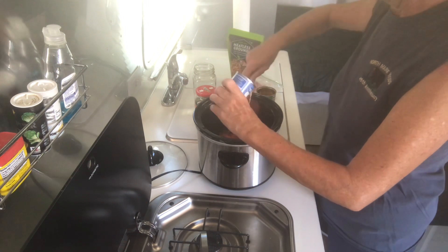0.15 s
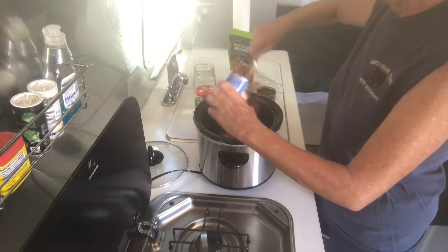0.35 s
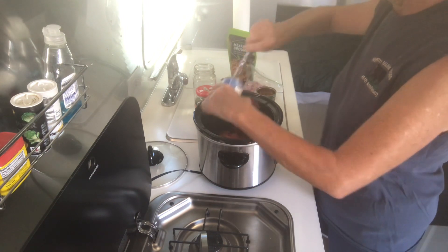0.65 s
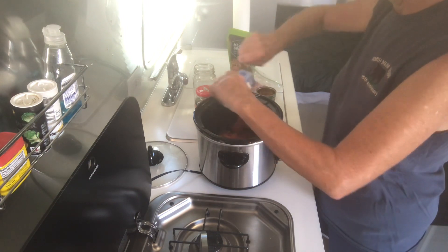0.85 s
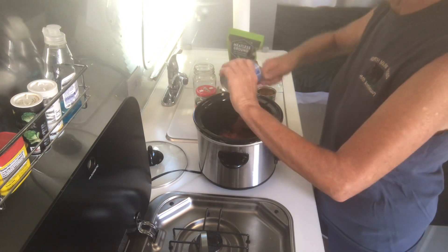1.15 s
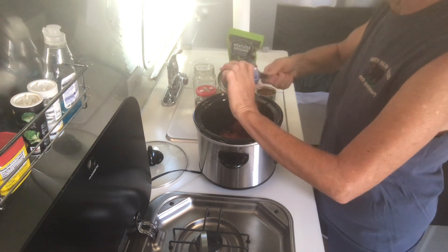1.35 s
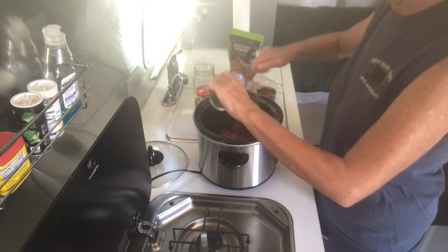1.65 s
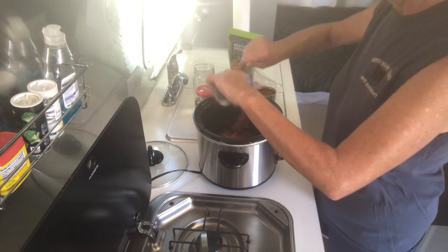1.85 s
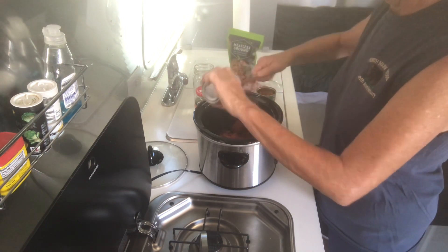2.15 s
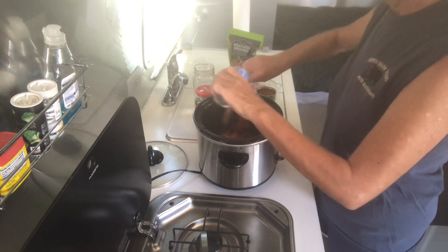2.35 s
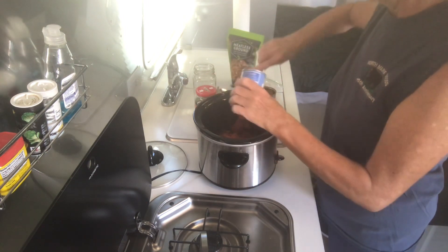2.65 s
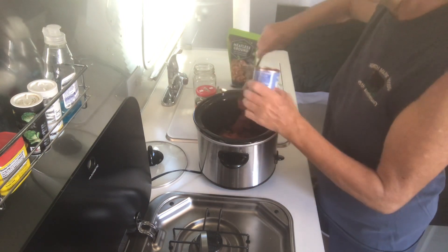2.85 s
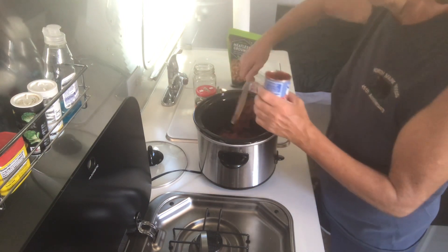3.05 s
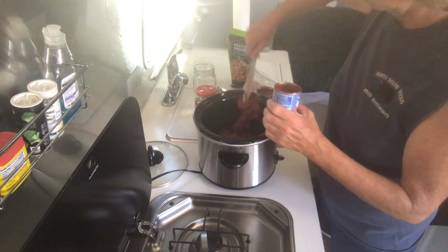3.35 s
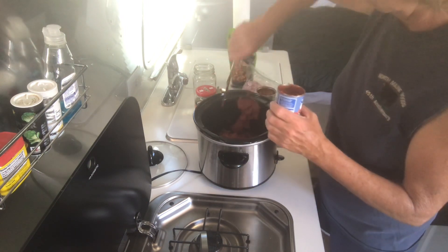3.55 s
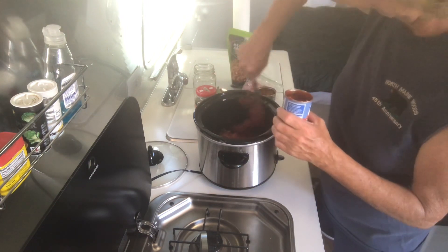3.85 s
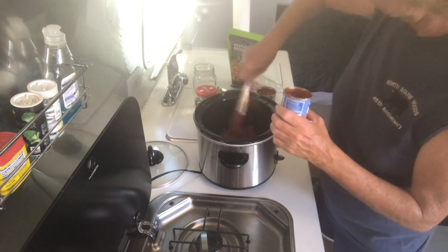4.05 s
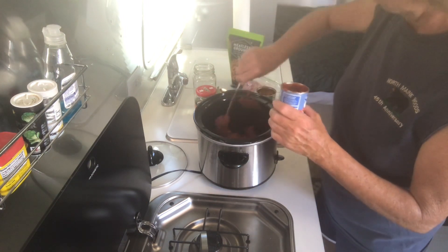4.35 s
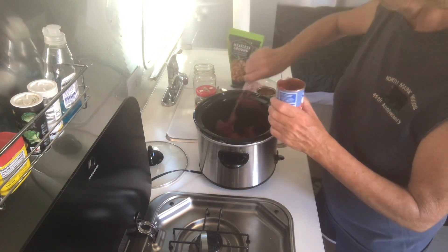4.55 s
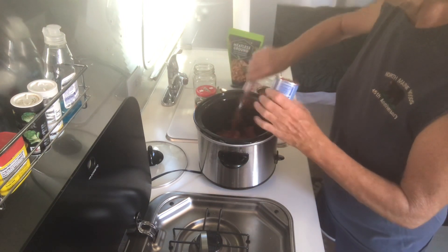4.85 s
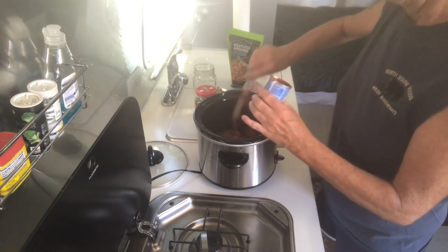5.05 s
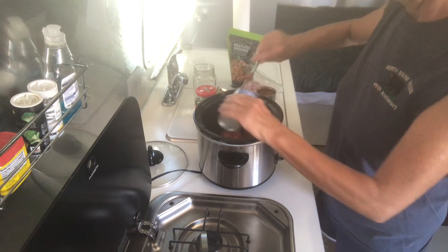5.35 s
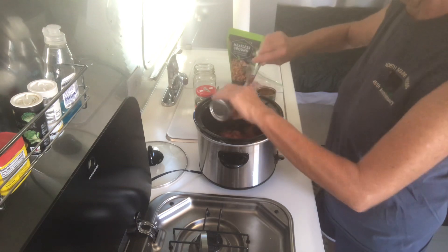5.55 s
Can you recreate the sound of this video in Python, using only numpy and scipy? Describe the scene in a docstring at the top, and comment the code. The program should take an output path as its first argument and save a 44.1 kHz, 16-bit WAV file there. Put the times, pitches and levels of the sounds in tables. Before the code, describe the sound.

A faint low appliance hum with soft rumble and hiss runs throughout in a small kitchen with a very short reflection, heard in mono from fairly near. At 0.15 s a steel spoon hits the stoneware rim of a slow cooker: a hard, bright clack with a short damped ring and a brief drag. From about 0.67 to 2.1 s the spoon works in a small tin: a quick pair of clanks near 0.7 with a scrape and slight squeak, duller bumps near 0.86 and 1.37, a sharper clank at 1.78, bumps near 2.1, and faint hollow rasps between. At 2.4 s another rim knock leads to a quiet 0.3-second drag; at 3.1 s a softer knock and faint wipe. At 3.6 s comes the strongest, brightest knock, followed by a gritty wipe with thin wavering squeaks until about 3.95. Afterward, only tiny ticks and wet paste touches, near 4.05, 4.4, 5.1 and 5.35 s.

```python
"""An appliance hums under a faint hiss; then a steel spoon knocks on the stoneware rim of a slow cooker.
After each knock the spoon drags over the rim, which sings and squeaks. In between it digs paste from a tin can.
Knocks and bumps are fading sine tones and noise; drags and scrapes are tiny random slips sent through resonances;
squeaks are gliding, wavering tones. A small kitchen answers all but the hum and hiss."""
import sys
import numpy as np
from scipy import signal
from scipy.fft import rfft, irfft, next_fast_len
from scipy.io import wavfile
from scipy.ndimage import uniform_filter1d, map_coordinates

SR = 44100
rng = np.random.default_rng(int(sys.argv[2]) if len(sys.argv) > 2 else 0)


def store_wav(level_fs):
    """Save 16-bit WAV to argv[1]."""
    pcm = np.round(np.clip(np.atleast_2d(level_fs), -1, 1) * 32767)
    wavfile.write(sys.argv[1], SR, pcm.T.astype(np.int16))


N = 251811  # length in samples


def amp(db):
    """Turn decibels into a gain."""
    return 10 ** (np.asarray(db) / 20)


def unit(x):
    """Scale to an rms of 1."""
    return x / np.sqrt(np.mean(x ** 2) + 1e-20)


def along(points, hz):
    """Read a curve of (Hz, value) points, with straight lines on a log-frequency axis."""
    point_hz, value = np.transpose(points)
    return np.interp(np.log(hz + 1), np.log(point_hz + 1), value)


def filtered(x, response):
    """Multiply the spectrum of x by a function of frequency."""
    size = next_fast_len(len(x) + 8192)  # room for the ringing, so it does not wrap around
    spectrum = rfft(x, size) * response(np.fft.rfftfreq(size, 1 / SR))
    return irfft(spectrum, size)[:len(x)]


def noise(colour_db, size):
    """Noise of rms 1 whose spectrum follows a function of frequency in dB."""
    return unit(filtered(rng.standard_normal(size), lambda hz: amp(colour_db(hz))))


def hump(hz, centre_hz, octaves):
    """A bell of height 1 on a log-frequency axis."""
    return np.exp(-.5 * (np.log2((hz + 1) / centre_hz) / octaves) ** 2)


def below(hz, edge_hz, order=4):
    """A share that falls from 1 to 0 around the edge."""
    return 1 / (1 + (hz / edge_hz) ** order)


def resonances(modes, hz):
    """Causal response of (Hz, width Hz, dB) resonances, added with alternating sign."""
    total = 0
    for k, (centre, width, db) in enumerate(modes):
        peak = 1j * hz * width / (centre * centre - hz * hz + 1j * hz * width)
        total = total + (-1) ** k * amp(db) * peak
    return total


def wobble(rate, size=N):
    """A smooth random curve with `rate` random points a second."""
    points = rng.standard_normal(int(size * rate / SR) + 4)
    return map_coordinates(points, [np.arange(size) * rate / SR])


def add(track, s, sound):
    """Mix a sound into the track at time s, cutting it off at the track's end."""
    part = track[round(s * SR):][:len(sound)]
    part += sound[:len(part)]


def slips(rate, spread_db, flutter_db, roam_db):
    """Friction force: tiny uneven slips; as the contact point travels, they favour ever different frequencies."""
    happens = rng.random(N) < rate / SR  # about `rate` slips a second
    force = happens * rng.choice([-1, 1], N) * amp(spread_db * rng.standard_normal(N))
    z = signal.stft(force * amp(flutter_db * wobble(90)), nperseg=512)[2]
    # random patches over frequency and time, smoothed both ways
    field = uniform_filter1d(rng.standard_normal(z.shape), size=4, axis=0)
    field = uniform_filter1d(field, size=10, axis=1)
    return unit(signal.istft(z * amp(roam_db * unit(field)), nperseg=512)[1][:N])


def stroke(s, length, attack_s, release_s):
    """One move of the hand: its attack-hold-release gain and its progress from 0 to 1."""
    t = np.arange(N) / SR - s
    gain = np.clip(t / attack_s, 0, 1) * np.exp(-np.maximum(t - length, 0) / release_s)
    return gain, np.clip(t / length, 0, 1)


# How long the kitchen's answer lasts. Each row: frequency in Hz, time to fall by 60 dB in seconds.
KITCHEN_DECAY = [(150, 0.3), (1000, 0.21), (4000, 0.17), (14000, 0.15)]


def in_kitchen(x, wet_db, delay=0.0043):
    """Direct sound and, `delay` seconds later, the short fading answer of counter, walls and cupboards."""
    hz, t, z = signal.stft(rng.standard_normal(SR // 3), SR, nperseg=256)
    fade = amp(-60 * t / along(KITCHEN_DECAY, hz)[:, None])
    tail = signal.istft(z * fade, SR, nperseg=256)[1]
    tail = np.pad(tail / np.linalg.norm(tail), (round(delay * SR), 0))
    answer = amp(wet_db) * signal.fftconvolve(x, tail)[:len(x)]
    return (x + answer) / np.hypot(1, amp(wet_db))


# Colour of the rumble and hiss. Each row: frequency in Hz, relative level in dB.
AIR_COLOUR = [(20, -48.5), (30, -25), (45, -4.5), (65, -6), (100, -1), (150, -10), (230, -15), (420, -20.5),
              (1200, -22.5), (1750, -27.5), (4500, -33.5), (10400, -41), (13000, -39.5), (16000, -46.5)]
# Tones of the appliance. Each row: frequency in Hz, middle level in dB.
HUM_TONES = [(58, -63.5), (115.5, -64), (169, -70.5), (227, -79), (281, -82.5), (332, -81.5), (1179, -83)]


def background(air_db=-60, drift=0.49, waver_db=3.0):
    """An appliance motor hums in unsteady sine tones over the room's rumble and hiss of coloured noise."""
    t = np.arange(N) / SR
    hum = np.zeros(N)
    for hz, db in HUM_TONES:
        level = np.sqrt(2) * amp(db + waver_db * wobble(4.1))
        hum += level * np.sin(2 * np.pi * hz * t + drift * wobble(28))
    return hum + amp(air_db) * noise(lambda hz: along(AIR_COLOUR, hz), N)


# Light touches and wet paste smacks. Each row: start in seconds, level in dB, centre of the noise in Hz.
TOUCHES = [(.314, -45, 5200), (.882, -43.5, 6000), (1.525, -59, 7800), (2.574, -55, 6500),
           (3.334, -64, 9000), (4.0503, -55.5, 9400), (4.433, -61, 12000), (4.448, -56, 2790),
           (5.075, -63.5, 3200), (5.115, -64.5, 11000), (5.355, -64, 3310)]


def ticks(t60=0.037, focus_db=26, octaves=1.0):
    """Small touches of spoon and paste: short noise that dies away without ring."""
    out, t = np.zeros(N), np.arange(SR // 5) / SR
    for s, db, centre_hz in TOUCHES:
        touch = noise(lambda hz: focus_db * hump(hz, centre_hz, octaves), len(t))
        add(out, s, touch * amp(db - 60 * t / t60))
    return in_kitchen(out, wet_db=-7)


# Resonances of the can and the air in it. Each row: frequency in Hz, width in Hz, relative level in dB.
CAN_MODES = [(350, 44, -11), (606, 58, -9.5), (820, 103, -5.5), (923, 26.6, 6), (1230, 55, 2.5),
             (1680, 44, -11), (1853, 66, -12.5), (2597, 130, -5.5), (3240, 290, -14), (3460, 130, -11.5),
             (3710, 440, -14.5), (4730, 160, -10.5), (6140, 290, -14.5), (6190, 83, -8), (7520, 39, -18),
             (8700, 65, -23)]
# Colour of steel on tin. Each row: frequency in Hz, relative level in dB.
TIN_COLOUR = [(150, -6), (400, -11.5), (1000, 1), (1900, -3), (3300, 3), (5000, 1.5), (6500, 1.5),
              (9000, -2), (11000, -7), (14000, -6.5), (16000, -13)]
# The spoon bumps the can. Each row: start in seconds, clack level in dB, favoured frequency in Hz,
# its boost in dB, time for the clack to fall by 60 dB in seconds, boost of the lower part in dB.
CAN_BUMPS = [(0.6651, -25.5, 3070, 14, 0.037, 4.5), (0.7112, -29, 3020, 14, 0.024, 13.5),
             (0.858, -41, 1360, 18.5, 0.067, 9.5), (1.3658, -36, 347, 21.5, 0.049, 15),
             (1.7758, -28.5, 3780, -1, 0.072, -1), (1.956, -52, 1050, 10, 0.07, 2),
             (2.09, -34, 1055, 6.5, 0.11, 8.5), (2.117, -35, 2640, 16.5, 0.044, 8)]


def can_bumps(ring_db=-6, favour_octaves=0.19):
    """Hand and paste damp the tin: a short noise clack, and a hollow ring it excites in the can."""
    out, t = np.zeros(N), np.arange(SR // 3) / SR
    for s, db, spot_hz, spot_db, t60, thud_db in CAN_BUMPS:
        def colour(hz):
            spot = spot_db * hump(hz, spot_hz, favour_octaves)
            return along(TIN_COLOUR, hz) + spot + thud_db * below(hz, 2900)
        clack = noise(colour, len(t)) * amp(-60 * t / t60)
        ring = unit(filtered(clack, lambda hz: resonances(CAN_MODES, hz))) * np.std(clack)
        add(out, s, amp(db) * in_kitchen(clack + amp(ring_db) * ring, wet_db=-9))
    return out


SCRAPE_ATTACK_S, SCRAPE_RELEASE_S = 0.012, .014  # the edge bites; the paste stops it
# Strokes of the spoon along the can wall. Each row: start in seconds, length in seconds, starting level in dB,
# gain in pressure over the stroke in dB, level of the rasp over the hollow ring in dB.
WALL_STROKES = [(0.705, 0.15, -41, -8.5, -4), (0.874, 0.19, -50, -7, 2), (1.086, 0.061, -52, 1.5, -0.5),
                (1.192, 0.19, -56.5, 4.5, -2), (1.386, 0.065, -57.5, 7.5, -1),
                (1.782, 0.033, -51.5, -4, 11.5), (1.826, .11, -48.5, -4, -1), (1.95, 0.17, -53.5, 9.5, 1.5)]


def can_scrapes(grit_db=-19):
    """The spoon's edge chatters along the wall: slips ring the air in the can and the thin tin."""
    hollow, rasp = np.zeros((2, N))
    for s, length, db, press_db, edge_db in WALL_STROKES:
        gain, progress = stroke(s, length, SCRAPE_ATTACK_S, SCRAPE_RELEASE_S)
        pressure = gain * amp(db + press_db * progress)
        hollow += pressure
        rasp += pressure * amp(edge_db)

    def body(hz):
        return resonances(CAN_MODES, hz) + amp(grit_db + along(TIN_COLOUR, hz))

    # the air rings alike wherever the spoon is; the wall answers differently from spot to spot
    air_slips = slips(rate=1700, spread_db=0.5, flutter_db=0.5, roam_db=-0.6)
    wall_slips = slips(rate=2500, spread_db=1.5, flutter_db=2.1, roam_db=3.0)
    cavity = unit(filtered(air_slips, lambda hz: body(hz) * below(hz, 2440)))
    wall = unit(filtered(wall_slips, lambda hz: body(hz) * (1 - below(hz, 1690))))
    return in_kitchen(hollow * cavity + rasp * wall, wet_db=-8.5)


# The steel sticks and squeaks on tin or glaze. Each row: start in seconds, length in seconds,
# starting pitch in Hz, ending pitch in Hz, middle level in dB (both pitch and level waver around these).
SQUEAK_TONES = [(0.713, 0.084, 1248, 1215, -47.5), (3.649, 0.032, 2557, 2494, -37.5),
                (3.681, 0.08, 2460, 2390, -49), (3.682, 0.032, 6140, 7100, -47),
                (3.792, 0.078, 2327, 2285, -41.5), (3.814, 0.092, 2814, 2890, -52.5),
                (3.832, 0.035, 8000, 8110, -44), (3.862, 0.034, 6730, 6660, -50),
                (3.897, 0.033, 6820, 7400, -43.5)]


def squeaks(waver=0.012, rough_db=3):
    """For moments the slips lock into an unsteady tone: a gliding sine with wavering pitch and level."""
    out = np.zeros(N)
    for s, length, start_hz, end_hz, db in SQUEAK_TONES:
        progress = np.linspace(0, 1, round(length * SR))
        glide = start_hz + (end_hz - start_hz) * progress
        pitch = glide * (1 + waver * wobble(600, len(progress)))
        swell = np.abs(np.sin(np.pi * progress)) ** 0.321
        level = swell * amp(db + rough_db * wobble(250, len(progress)))
        add(out, s, level * np.sin(2 * np.pi * np.cumsum(pitch) / SR))
    return in_kitchen(out, wet_db=-11)


# The spoon's own resonances, broadened by the hand.
# Each row: frequency in Hz, width in octaves, relative strength.
SPOON_MODES = [(2280, .13, .9), (4300, .09, 1.1), (6620, .085, 1.1), (8150, .05, .5), (10900, .045, 1)]


def spoon_ring(hz):
    """How strongly the spoon responds at each frequency: a sum of bells."""
    return sum(strength * hump(hz, centre_hz, octaves) for centre_hz, octaves, strength in SPOON_MODES)


# Ringing modes of the stoneware crock. Each row: frequency in Hz, relative level in dB,
# time to fall by 60 dB in seconds when nothing damps it further.
CROCK_MODES = [(350, -12, .16), (520, -13, .12), (872, -6, .16), (950, -14, .13), (1240, -10, .11),
               (1450, -12, .1), (2062, -7, .13), (2275, -4, .14), (2355, 0, .13), (2565, -2, .13),
               (2830, -13, .12), (4032, -2, .15), (4269, -7, .12), (4700, -5, .16), (4958, -9, .15),
               (5328, -7, .12), (5636, -10, .12), (5976, -4, .14), (6437, -4, .11), (6606, 4, .12),
               (6790, -4, .15), (7250, -9, .1), (7680, -8, .1), (8022, 0, .12), (8618, -5, .12),
               (9540, -8, .11), (11360, -10, .1), (12400, -14, .09), (13800, -11, .09)]
# Dense short modes, heard as noise. Each row: frequency in Hz, relative level in dB.
CLACK_COLOUR = [(60, -19.5), (200, -13), (380, -1.5), (900, 0.5), (2300, -2), (3200, -1.5), (4400, -4),
                (6500, 0), (9000, 1), (10600, -7.5), (13500, 1.5), (16000, -15)]
DRAG_ATTACK_S, DRAG_RELEASE_S = 0.0062, 0.0146  # the spoon settles on the rim; it slips off
DRAG_BRIGHTENS_DB = 4.5  # the grit grows over each wipe as the spoon speeds up
# After each knock the spoon is wiped over the rim. Each row: start in seconds, length in seconds,
# relative level in dB, gain in pressure in dB, easing midway in dB, relative level of grit over ring in dB.
RIM_WIPES = [(0.257, 0.0617, -60.5, 18.5, 6, -8), (2.497, .3, -58, -6.5, 4.5, -1),
             (3.208, .145, -66.5, 3.5, -3, 0.5), (3.633, 0.3, -43.5, -6.5, 7.5, 6)]


def rim_drags(low_db=-4, high_db=-3.0, grit_db=-14, damping=3, spoon_db=3.5, shimmer_db=4):
    """Slips on the glaze feed the spoon and the crock's modes; the hand eases midway and presses again at the edge."""
    low, high = np.zeros((2, N))
    for s, length, db, press_db, ease_db, bright_db in RIM_WIPES:
        gain, progress = stroke(s, length, DRAG_ATTACK_S, DRAG_RELEASE_S)
        easing = ease_db * np.sin(np.pi * progress) ** 2
        pressure = gain * amp(db + press_db * progress - easing)
        low += pressure
        high += pressure * amp(bright_db + DRAG_BRIGHTENS_DB * (progress - .5))
    # a shorter decay is a wider resonance; damping widens it further
    modes = [(hz, damping * np.log(1000) / (np.pi * t60), db) for hz, db, t60 in CROCK_MODES]

    def body(hz):
        spoon = amp(spoon_db * spoon_ring(hz) + shimmer_db * hump(hz, 4530, .16))
        crock = resonances(modes, hz) + amp(grit_db + along(CLACK_COLOUR, hz))
        return crock * spoon * below(hz, 11000)

    force = slips(rate=6000, spread_db=4.0, flutter_db=0.8, roam_db=4.5)
    sing = unit(filtered(force, lambda hz: body(hz) * below(hz, 3300)))
    grit = unit(filtered(force, lambda hz: body(hz) * (1 - below(hz, 3300))))
    return in_kitchen(amp(low_db) * low * sing + amp(high_db) * high * grit, wet_db=-9.0)


# The spoon strikes the rim. Each row: start in seconds, level of the whole blow in dB, boost of the lower part
# in dB, boost of the treble in dB, favoured frequency in Hz, its boost in dB, boost of the spoon's ring in dB,
# counter thud relative to the blow in dB, delay of the rebound in seconds, rebound relative to the clack in dB.
RIM_BLOWS = [(0.151, -21, 1, 0, 5700, 5, 5.5, -27, .0055, 1),
             (2.4001, -24, 2, 0, 2200, 8.5, 3, -23.5, 0.0013, 8.5),
             (3.1032, -34, 0.5, -3.5, 6600, -2.5, 15.5, -24, .02, -5),
             (3.6013, -19, -1.5, 1.5, 8630, 3.5, 1.5, -44, .0155, -6.5)]


def rim_knocks(ring_db=-7, clack_db=-4, clack_t60=0.096, crack_t60=.016, favour_octaves=.28,
               rattle=1.0, contact_t60=0.5, thud_hz=125, thud_t60=0.62):
    """Each blow rings the crock and rebounds; the spot that is hit favours one group of modes."""
    out, t = np.zeros(N), np.arange(SR // 2) / SR
    for s, db, knock_db, treble_db, spot_hz, spot_db, spoon_db, thud_db, rebound_s, rebound_db in RIM_BLOWS:
        def colour(hz):
            tilt = knock_db * below(hz, 2100) + treble_db * (1 - below(hz, 7500))
            return tilt + spot_db * hump(hz, spot_hz, favour_octaves)

        def clack_colour(hz):
            return along(CLACK_COLOUR, hz) + colour(hz) + spoon_db * spoon_ring(hz)

        def clack(t60):
            return noise(clack_colour, len(t)) * amp(-60 * t / t60)

        # the spoon stays in loose contact: it damps the modes and makes them impure
        ring = np.zeros(len(t))
        for hz, level, t60 in CROCK_MODES:
            phase = 2 * np.pi * (hz * t + rng.random()) + rattle * wobble(140, len(t))
            uneven_db = rng.normal(0, 3.5)
            ring += amp(level + colour(hz) + uneven_db - 60 * t / t60) * np.sin(phase)
        blow = amp(ring_db - 60 * t / contact_t60) * ring
        blow += amp(clack_db) * clack(clack_t60)
        blow += clack(crack_t60)  # the very short first crack
        add(blow, rebound_s, amp(clack_db + rebound_db) * clack(clack_t60 / 2))
        # the cooker passes the blow on to the counter
        thud = noise(lambda hz: 60 * hump(hz, thud_hz, 0.53), len(t)) * amp(thud_db - 60 * t / thud_t60)
        attack = 1 - np.exp(-t / .0006)
        add(out, s, amp(db) * in_kitchen((blow + thud) * attack, wet_db=-9))
    return out


def scene():
    """All sources added together in one channel."""
    can = can_bumps() + can_scrapes()
    rim = rim_drags() + rim_knocks()
    return (background() + ticks() + can + squeaks() + rim)[None]


TOP_HZ = 16000  # band limit


def record(dry):
    """Keep nothing at or above the band limit."""
    return np.array([filtered(x, lambda hz: hz < TOP_HZ) for x in dry])


dry = scene()
out = record(dry)
store_wav(out)
```